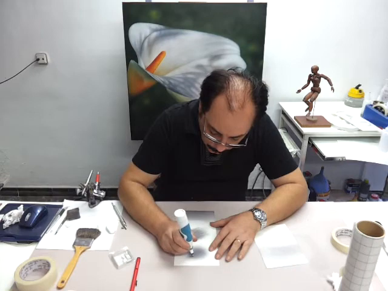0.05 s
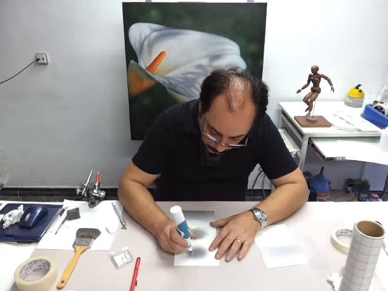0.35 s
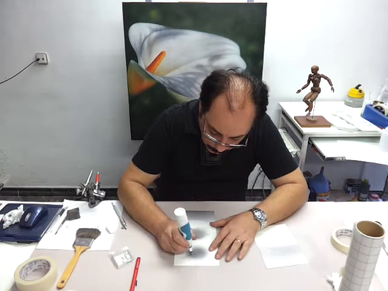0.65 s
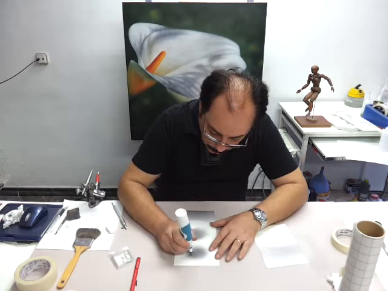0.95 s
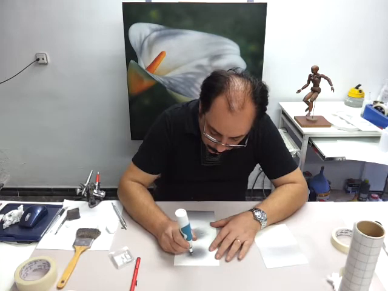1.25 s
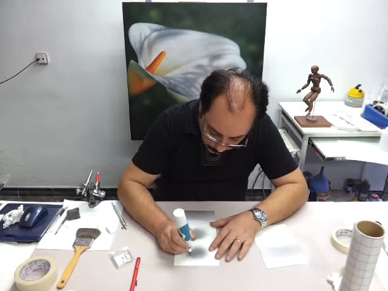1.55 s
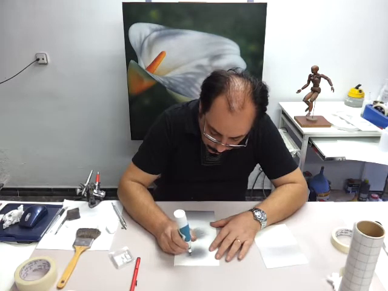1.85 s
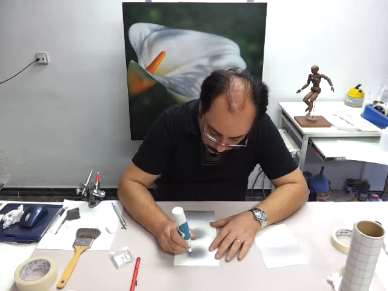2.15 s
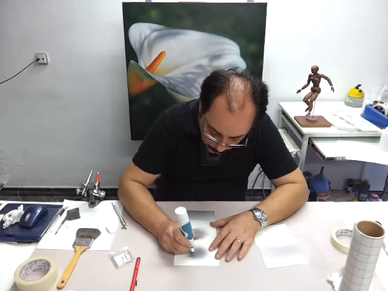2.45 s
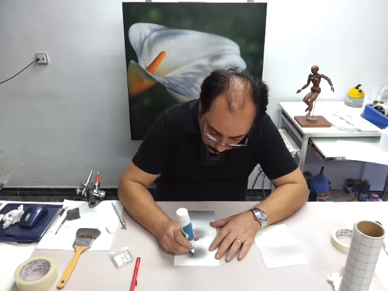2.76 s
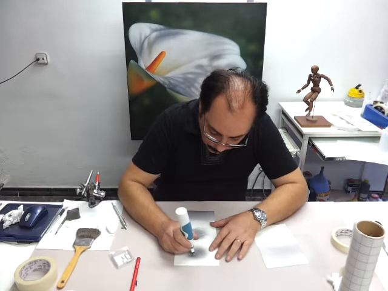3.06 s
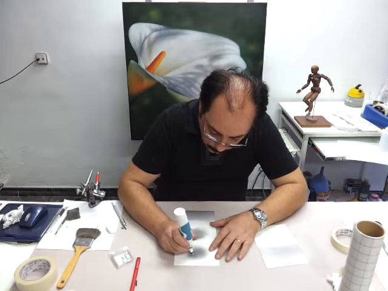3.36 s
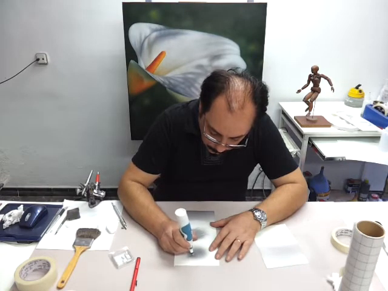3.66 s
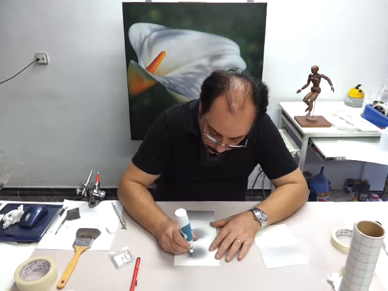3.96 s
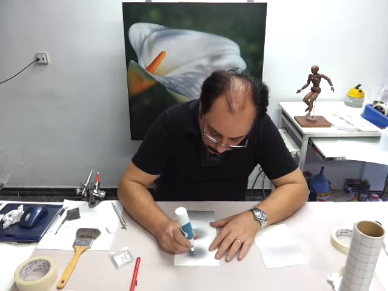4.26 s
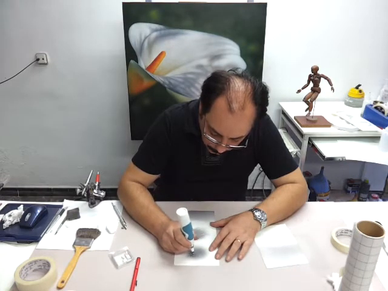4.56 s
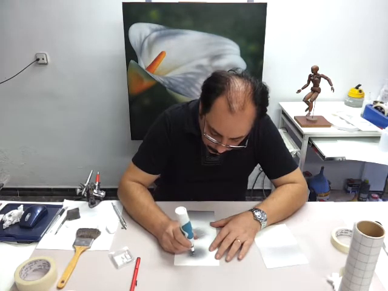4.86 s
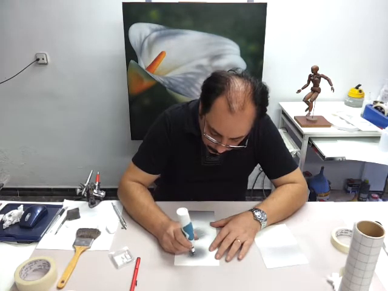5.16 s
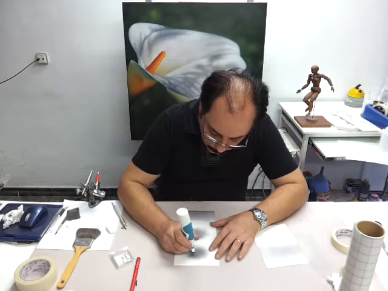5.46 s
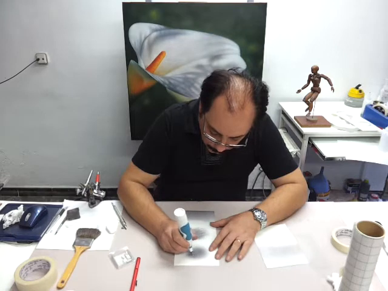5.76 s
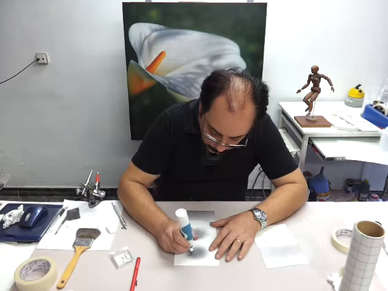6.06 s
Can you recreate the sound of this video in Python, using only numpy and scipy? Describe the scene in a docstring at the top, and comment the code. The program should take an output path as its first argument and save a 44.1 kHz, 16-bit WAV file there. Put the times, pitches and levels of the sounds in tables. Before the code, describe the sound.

A small electric eraser buzzes and rattles, dipping into brief rasping rubs each time it touches card, over a soft fan.

```python
"""Electric eraser on painted card

A small electric eraser works at a studio table while a fan airs the small, hard room. Lifted, its motor
runs fast with a thin whine, and the loose spindle knocks in the housing on every turn. Pressed down,
the tip skids, the motor slows, the knocking stops and the rubber ticks and rasps on the card."""
import sys
import numpy as np
from scipy import signal
from scipy.fft import rfft, irfft
from scipy.io import wavfile

SR = 44100
rng = np.random.default_rng(int(sys.argv[2]) if len(sys.argv) > 2 else 0)


def to_wav(sig):
    """Store sig (one row per channel, or 1-D mono) as 16-bit WAV at the path in sys.argv[1].

    Samples outside -1..1 are clipped; the rate is SR.
    """
    pcm = np.clip(np.atleast_2d(sig), -1, 1) * 32767
    pcm = np.round(pcm).astype(np.int16)
    wavfile.write(sys.argv[1], SR, pcm.T)  # frames by channels


N = 278712
TIME = np.arange(N) / SR
FULL_SPEED_HZ = 73.72  # spindle turns a second with no load

# Strokes on the card: (touch [s], hardest press [s], lift [s], speed at each of these three [Hz],
# tick [dB], rasp [dB], scrape [dB], roughness [0-1], landing skid [dB], lifting skid [dB])
STROKES = [(-.15, .08, .22, 67.9, 67.8, 67.8, -52.3, -54.3, -53, .25, -70, -58),
           (.835, 1.11, 1.29, 68.3, 67.25, 67.3, -56.5, -54.7, -52.8, .25, -54.5, -65),
           (1.735, 1.88, 2.08, 67.4, 67.0, 67.1, -58.8, -56.5, -62, .35, -50.3, -56.5),
           (2.68, 2.93, 3.03, 69.4, 66.2, 65.8, -55.5, -53.8, -53.3, .65, -55.5, -60),
           (3.655, 3.9, 4.075, 69.8, 67.7, 67.9, -54, -56, -58.5, .5, -53, -66),
           (4.45, 4.6, 4.67, 70.0, 66.1, 66.3, -56.2, -55.2, -58, .55, -49, -64),
           (5.095, 5.285, 5.48, 66.4, 62.9, 65.8, -53, -49.1, -50.5, .65, -50, -55),
           (6.027, 6.12, 6.37, 64.7, 64.5, 65.8, -56, -57.5, -61, .3, -54.5, -70)]


def amp(db):
    """Turns decibels into a gain."""
    return 10 ** (np.asarray(db) / 20)


def unit(x):
    """Scales a signal to an average (rms) level of 1."""
    return x / np.sqrt(np.mean(x ** 2) + 1e-20)


def read(points, hz):
    """Looks up a (frequency, value) table on a log-frequency axis."""
    f, value = np.transpose(points)
    return np.interp(np.log(hz + 1), np.log(f), value)


def held(rows, starts):
    """The columns of whichever row applies at each moment."""
    return np.array(rows)[np.maximum(np.searchsorted(starts, TIME) - 1, 0)].T


def wander(rate_hz):
    """A random drift, about 1 in size."""
    knots = rng.standard_normal(4096)
    return unit(np.interp(TIME * rate_hz, np.arange(len(knots)), knots))


def pan(left_db):
    """Two channel gains, the left one louder by left_db."""
    return amp(np.array([np.atleast_1d(left_db), -np.atleast_1d(left_db)]) / 2)


def colour(x, curve, rings=(), size=8192):
    """Shapes a sound with a tone curve and with resonances that ring after each blow."""
    hz = abs(np.fft.fftfreq(size, 1 / SR))
    db = read(curve, hz) + sum(boost / (1 + (2 * (hz - f) / width) ** 2) for f, width, boost in rings)
    spectrum = np.exp(np.conj(signal.hilbert(np.log(amp(db)))))  # no ringing before the blow
    response = np.fft.ifft(spectrum).real[:size // 2]
    return signal.oaconvolve(x, response / np.linalg.norm(response))[:N]


def blows(turns, angle, jitter_s, spread_db):
    """One click a turn at the given angle (in turns), uneven in time and strength."""
    late, strong = rng.standard_normal((2, 600))
    whole = np.arange(1, int(turns[-1]) - 1)
    at = (np.interp(whole + angle, turns, TIME) + jitter_s * late[whole]) * SR
    near = at.astype(int)[:, None] + np.arange(-7, 9)
    offset = near - at[:, None]
    shape = np.sinc(offset) * np.cos(np.pi * offset / 16) ** 2  # lets a click fall between samples
    clicks = shape * amp(spread_db * strong[whole, None])
    return unit(np.bincount(np.clip(near, 0, N - 1).ravel(), clicks.ravel(), N))


def room(x, wet_db, wide_db, sway=0.56):
    """Adds the room's short wash of echoes, which shift as the hand moves."""
    decay = [(200, 0.48), (1000, 0.33), (4000, 0.23), (12000, 0.045)]  # echo length: (frequency [Hz], time to fade by 60 dB [s])
    starts = np.arange(100, SR // 2, 16)
    arrivals = starts + rng.integers(0, 16, (2, len(starts)))
    taps = np.zeros((2, SR // 2 + 16))
    np.put_along_axis(taps, arrivals, rng.choice([-1., 1.], arrivals.shape), 1)
    hz, t, spectra = signal.stft(taps, SR, nperseg=256)
    tail = signal.istft(spectra * amp(-60 * t / read(decay, hz)[:, None]), SR, nperseg=256)[1]
    first, second = signal.oaconvolve(x[None], tail / np.linalg.norm(tail[0]), axes=1)[:, :N]
    echoes = (first + 1j * second) * np.exp(1j * (sway * wander(2.03) + 0.69 * TIME))
    return x + amp(wet_db) * echoes.real + amp(wide_db) * np.array([echoes.imag, -echoes.imag])


def fan():
    """Moving air booms in a few resonances, with a faint hiss and a thin, wavering whine."""
    air_curve = [(20, -25), (45, -34), (100, -20.5), (200, -8.5), (350, -3.5), (550, -1.5), (900, -4.5),
                 (1500, 0.5), (2500, -4.5), (5000, -12), (8000, -10.5), (11000, -13), (14500, -16.5)]  # tone of the air: (frequency [Hz], level [dB])
    air_rings = [(255.3, 13.3, 10.2), (408.8, 38, 9.4), (487.2, 23.3, 11.8), (530, 34, 4.9),
                 (646.3, 64, 13.3), (737, 89, 6.7), (807, 66, 5), (1000, 52, 10.1)]  # its resonances: (frequency [Hz], width [Hz], boost [dB])
    air_width = [(60, -3), (110, 0), (200, -2.5), (370, -7.5), (680, -12.5), (1250, -2), (2290, -4.5),
                 (4210, 2), (7730, -0.5), (14200, 0.5)]  # stereo spread: (frequency [Hz], side minus mid [dB])
    mid, side = (colour(noise, air_curve, air_rings) for noise in rng.standard_normal((2, N)))
    side = irfft(rfft(side) * amp(read(air_width, np.fft.rfftfreq(N, 1 / SR))), N)
    air = amp(-50.5 + 0.55 * wander(14)) * np.array([mid + side, mid - side])
    whine_hz = 1177 + 2 * wander(24.7)
    whine = unit(np.sin(2 * np.pi * np.cumsum(whine_hz) / SR) * amp(2.7 * wander(7.3)))
    return pan(1.6) * (air + amp(-63.5) * whine)


def table_top(turns, pressed, sag_hz):
    """The hands nudge the table in faint, deep bumps; under a hard press it hums with the spindle."""
    nudges_per_s = 7 + 5 * pressed
    nudges = (rng.random(N) < nudges_per_s / SR) * rng.uniform(0.39, 1, N)
    thuds = colour(nudges, [(20, -12), (45, -13), (70, -15), (110, 2), (200, -23), (500, -66),
                            (2000, -90)])
    hum = pressed * np.sin(2 * np.pi * turns) * amp(2.5 * sag_hz - 110 + 2 * wander(5.7))
    return pan(10) * (unit(thuds) * amp(-91.5) + hum)


def contact(grip_s, release_s, lag_s):
    """0 with the tip in the air, 1 with it pressed on the card."""
    strokes = ((1 + np.tanh((TIME - touch - lag_s) / grip_s)) * (1 + np.tanh((lift - TIME) / release_s))
               for touch, _, lift, *_ in STROKES)
    return np.clip(sum(strokes) / 4, 0, 1)


def coasting():
    """Between strokes the motor creeps up to speed, the whine swells or fades and the chatter settles."""
    # Each run in the air: (top speed [Hz], rattle [dB], whine [dB], its swell [dB/s], chatter [dB])
    free_runs = [(73.7, -52.5, -67, 2, -81), (73.6, -53.2, -65, -8, -77), (73.3, -53, -68, -7, -67),
                 (72.97, -53.1, -67, -17, -64), (73.05, -53, -64, -4, -64), (72.76, -52.8, -62, -2, -70),
                 (72.1, -53.2, -58.3, 20, -58.5)]
    touches, hardest, lifts = np.transpose(STROKES)[:3]
    start, end = held(np.c_[lifts[:-1], touches[1:]], hardest[:-1])
    top_hz, rattle_db, whine_db, swell, chatter_db = held(free_runs, hardest[:-1])
    now = np.clip(TIME, start, end)
    from_middle = now - (start + end) / 2
    speed = top_hz - 1.2 * np.exp((start - now) / .17)
    arch_db = 2 * (2 * from_middle / (end - start)) ** 2  # softens the whine at both ends of a run
    return speed, rattle_db, whine_db + swell * from_middle - arch_db, chatter_db - 1.5 * (now - start)


def pressing():
    """In each stroke the hand bears down and eases off: the motor slows; tick, rasp and scrape swell."""
    touches, _, lifts = np.transpose(STROKES)[:3]
    midway = np.r_[0, (lifts[:-1] + touches[1:]) / 2]
    touch, hardest, lift, touch_hz, hardest_hz, lift_hz, *hard_db, rough, _, _ = held(STROKES, midway)
    before = np.clip((hardest - TIME) / (hardest - touch), 0, 1)
    after = np.clip((TIME - hardest) / (lift - hardest), 0, 1)
    speed = hardest_hz + (touch_hz - hardest_hz) * before ** 1.4 + (lift_hz - hardest_hz) * after
    lightness = before ** 2.6 + after ** 2  # 0 at the hardest press, 1 at touch and lift
    light_db = (-59.5, -56.5, -64.5)  # tick, rasp and scrape under the lightest touch
    levels_db = [hard + (light - hard) * lightness for hard, light in zip(hard_db, light_db)]
    return speed, *levels_db, rough


def drive_whine(turns, lifted, whine_db):
    """Spinning free, the drive gives thin, high tones that flutter a little and throb once a turn."""
    partials = [(59, 0), (72, -10)]  # the tones: (multiple of the spindle speed, level [dB])
    tone = sum(amp(db + 2.2 * wander(9.8)) * np.cos(2 * np.pi * order * turns + .2 * wander(40))
               for order, db in partials)
    throb = 1 + 0.3 * np.cos(2 * np.pi * (turns - .12))
    return pan(-11) * lifted * amp(whine_db) * unit(tone * throb)


def housing_buzz(turns, drift_db=1.3, width_rad=.41, resonance_db=3.5):
    """The plastic shell rings after each knock; its higher tones sway most as the hand moves."""
    partials = [(7, -69), (8, -78), (9, -65), (10, -69), (11, -56.3), (12, -66.5), (13, -61.8), (14, -69),
                (15, -75), (16, -73), (17, -72), (18, -70), (19, -65.5), (20, -61.5), (21, -59.6),
                (22, -67.5), (23, -61.5), (24, -61.5), (25, -58.3), (26, -60.2), (27, -60.2), (28, -60.2),
                (29, -65.5), (30, -67), (31, -68.5), (32, -76), (33, -67.5)]  # the shell's tones: (multiple of the spindle speed, level [dB])
    # Each knock gives a short rising chirp and a late low note: (frequency [Hz], delay [turns])
    delays = [(500, .21), (900, 0.199), (1200, 0.423), (1450, .0), (1800, 0.024), (2000, 0.23),
              (2300, 0.282)]
    # The shifting grip retunes and damps the shell: (time [s], resonance [Hz], ring level [dB])
    grip = [(.22, 1500, 0), (.45, 1510, 0.7), (.83, 1510, -0.5), (1.3, 1550, 0.5), (1.5, 1570, 0),
            (1.73, 1530, 0), (2.08, 1720, -1.5), (2.28, 1740, 1.5), (2.4, 1920, 0.3), (2.68, 1930, -0.5),
            (3.04, 1690, -1), (3.12, 1950, 0), (3.25, 1930, 0.5), (3.35, 1780, 0.5), (3.5, 1750, 1),
            (3.65, 1730, .6), (4.08, 1850, -1.2), (4.28, 1730, 0), (4.45, 1700, -1), (4.67, 1880, -1.5),
            (5.09, 1950, 1), (5.5, 1660, -0.5), (5.58, 1630, 1), (5.7, 1470, -1), (6.03, 1420, -1)]
    # Late on, the tones fall out of step and blur into a grind: (time [s], phase scatter [rad])
    blur = [(5.56, .65), (5.76, 1.4)]
    times, *columns = np.transpose(grip)
    centre_hz, ring_db = (np.interp(TIME, times, column) for column in columns)
    scatter = np.interp(TIME, *np.transpose(blur))
    angle = 2 * np.pi * (turns + .0003 * wander(60))
    buzz, lag = np.zeros((2, N)), 0
    for order, db in partials:
        hz = order * FULL_SPEED_HZ
        lag += 2 * np.pi * read(delays, hz)
        phase = order * angle - lag + scatter * rng.standard_normal()
        in_tune = 1 / (1 + ((hz - centre_hz) / 100) ** 4)
        grip_db = ring_db * (hz > 1250) + resonance_db * in_tune  # the grip leaves the low hum alone
        sway_db = drift_db * hz / centre_hz * wander(2.91)
        apart = width_rad * rng.choice([-1, 1])  # reflections put the two ears out of step
        buzz += amp(db + grip_db + sway_db) * np.cos([phase + apart, phase - apart])
    return np.sqrt(2) * buzz * amp(0.14 * wander(110))  # no two turns are equally strong


def loose_spindle(turns, lifted, rattle_db, chatter_db):
    """The spindle clacks twice a turn, hard then light; the shell buzzes and at times chatters."""
    # Tone of each kind of knock: (frequency [Hz], level [dB])
    clack_curve = [(60, -69), (300, -44), (900, -51), (2300, 0), (3500, 2.5), (4700, -1), (5900, 1.5),
                   (6600, -4.5), (8500, -21.5), (14000, -57)]
    rebound_curve = [(60, -74), (500, -19), (2500, -6.5), (4200, 7), (6000, 1.5), (7500, -3.5), (8800, -16),
                     (14000, -30)]
    chatter_curve = [(60, -65), (600, -15), (1300, -4), (2200, -13.5), (3200, -13.5), (6500, -25.5),
                     (8500, -28), (14000, -47)]
    # Their resonances: (frequency [Hz], width [Hz], boost [dB])
    clack_rings = [(2900, 480, 3.2), (3640, 120, 3), (4320, 110, 7.8), (5280, 210, 6), (5680, 190, 4.6)]
    rebound_rings = [(7940, 230, 2.3)]
    chatter_rings = [(5430, 260, 13), (7380, 370, 21)]
    clack = colour(blows(turns, 0, jitter_s=7e-6, spread_db=0.6), clack_curve, clack_rings)
    rebound = colour(blows(turns, .77, jitter_s=2e-5, spread_db=1.5), rebound_curve, rebound_rings)
    chatter = colour(blows(turns, .71, jitter_s=4e-5, spread_db=-1), chatter_curve, chatter_rings)
    knocks = amp(rattle_db) * (amp(-3) * clack + amp(-6.5) * rebound) + amp(chatter_db) * chatter
    rattle = room(lifted * knocks, wet_db=-3, wide_db=-4, sway=.55)
    return pan(-3.5) * rattle + lifted * amp(-0.36) * pan(1) * housing_buzz(turns)


def skidding(lead_s=0.0084):
    """Brief swells in level as the tip skids, just ahead of each touch and lift."""
    def swell(at_s, db, half_s):
        return amp(db) * np.exp(-((TIME - at_s + lead_s) / half_s) ** 2 / 2)
    return sum(swell(touch, landing_db, half_s=0.02) + swell(lift, lifting_db, half_s=0.016)
               for touch, _, lift, *_, landing_db, lifting_db in STROKES)


def facets(turns, harmonics=210, size=8192):
    """The tip's worn faces meet the card in the same pattern on every turn."""
    pattern = irfft(np.r_[0, np.exp(2j * np.pi * rng.random(harmonics))], size)
    return np.interp(turns, np.arange(size) / size, pattern, period=1)


def rubbing(turns, pressed, sag_hz, tick_db, rasp_db, scrape_db, rough):
    """The tip catches once a turn and its grit rings the holder: pitched on smooth card, hissy on rough."""
    # Tone of each sound of the tip: (frequency [Hz], level [dB])
    tick_curve = [(40, -68), (150, -24), (500, -1), (1100, -0.5), (2300, 0), (4000, -1.5), (6500, -8),
                  (8000, -13), (10000, -6.5), (14000, -30)]
    snap_curve = [(40, -67), (500, -9), (2000, -1), (3000, 5), (4300, 7), (6200, -10), (7800, 1),
                  (9500, -16), (14000, -23)]
    rasp_curve = [(40, -64), (150, -17), (600, 6), (1300, 1.5), (1700, 8), (2300, 8.5), (3000, -3),
                  (4000, 7), (6000, 9), (7500, 6), (9500, -7.5), (14000, -31)]
    scrape_curve = [(60, -70), (1500, -28), (2400, -11), (2750, -2.5), (3250, -5), (3700, -15), (4400, -14),
                    (6000, -22), (14000, -56)]
    skid_curve = [(40, -47), (300, -13), (1500, 4.5), (4000, 5.5), (7500, 4.5), (10000, -8), (14000, -15)]
    # Their resonances: (frequency [Hz], width [Hz], boost [dB])
    tick_rings = [(1075, 70, 8), (1353, 33, 11.2), (1414, 51, 6.6), (1610, 50, 6), (1780, 55, 8),
                  (2182, 120, 11.3), (2506, 80, 7.3), (2770, 130, 10), (2957, 70, 11), (3130, 60, 3.7),
                  (4400, 190, 10)]
    rasp_rings = [(1660, 160, 2.5), (1884, 280, 6), (4430, 220, 4.7), (5860, 380, 2.2)]
    scrape_rings = [(2218, 90, 19.5), (2510, 70, 4), (2770, 130, 4.5), (2965, 110, 6), (3220, 130, 6),
                    (4410, 160, 5)]
    catches = pressed * blows(turns, 0, jitter_s=12e-6, spread_db=1.5)
    tick = colour(catches, tick_curve, tick_rings) * amp(tick_db - 2.5)
    # A hard press makes the rubber let go with a dry snap.
    snap = -colour(catches, snap_curve) * amp(tick_db + 1.4 * sag_hz - 13.3)
    bite = .16 + np.exp(-(turns % 1) / .16)  # strongest just after each catch
    grit = unit(bite * rng.standard_normal(N) * amp(1.4 * wander(500)))
    friction = np.sqrt(rough) * grit + np.sqrt(1 - rough) * unit(bite * facets(turns))
    rasp = colour(friction, rasp_curve, rasp_rings) * pressed * amp(rasp_db - 2)
    shaking = rough * grit + (1 - rough) * catches
    scrape = colour(shaking, scrape_curve, scrape_rings) * pressed * amp(scrape_db)
    skid = colour(grit, skid_curve) * skidding()
    return pan(-2.5) * (snap + room(tick, wet_db=1.5, wide_db=-4.5)
                        + room(rasp + skid, wet_db=-3, wide_db=-5)
                        + room(scrape, wet_db=-5.5, wide_db=-5))


def scene():
    """One spindle drives both the buzz and the rubbing; touching the card trades one for the other."""
    free_hz, rattle_db, whine_db, chatter_db = coasting()
    loaded_hz, tick_db, rasp_db, scrape_db, rough = pressing()
    braking = contact(grip_s=0.0284, release_s=0.0161, lag_s=.022)  # inertia delays the slowing
    speed = free_hz + (loaded_hz - free_hz) * braking
    turns = np.cumsum(speed) / SR
    sag_hz = FULL_SPEED_HZ - speed  # the harder the press, the more speed is lost
    pressed = contact(grip_s=0.029, release_s=0.0083, lag_s=-0.0091)
    lifted = 1 - pressed
    motor = loose_spindle(turns, lifted, rattle_db, chatter_db) + drive_whine(turns, lifted, whine_db)
    tip = rubbing(turns, pressed, sag_hz, tick_db, rasp_db, scrape_db, rough)
    return motor + tip + table_top(turns, pressed, sag_hz) + fan()


def record(dry):
    """Cuts off the treble above 14.6 kHz."""
    low_pass = signal.firwin(601, 14600, window=("kaiser", 7), fs=SR)
    return signal.oaconvolve(dry, low_pass[None], "same")


dry = scene()
out = record(dry)
to_wav(out)
```